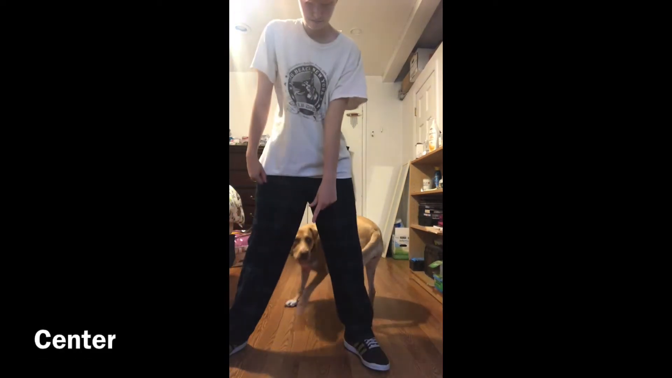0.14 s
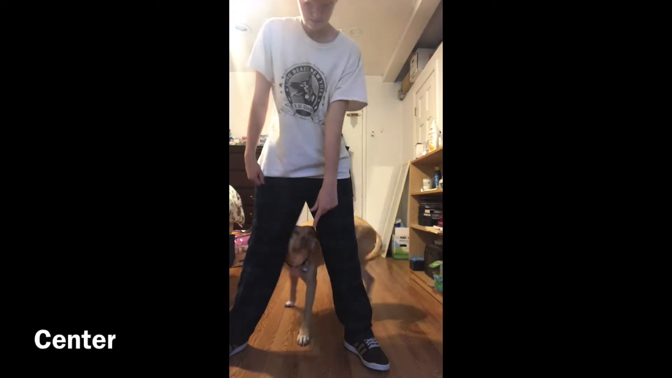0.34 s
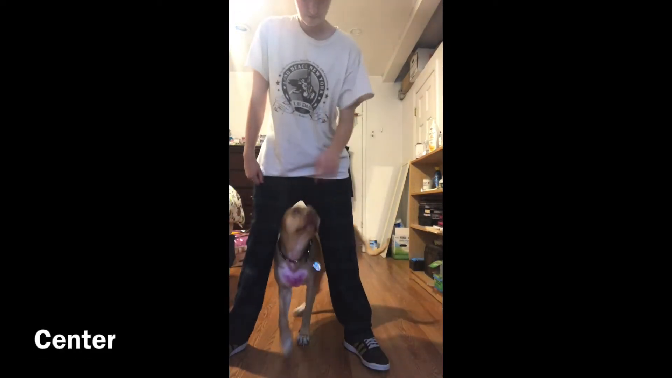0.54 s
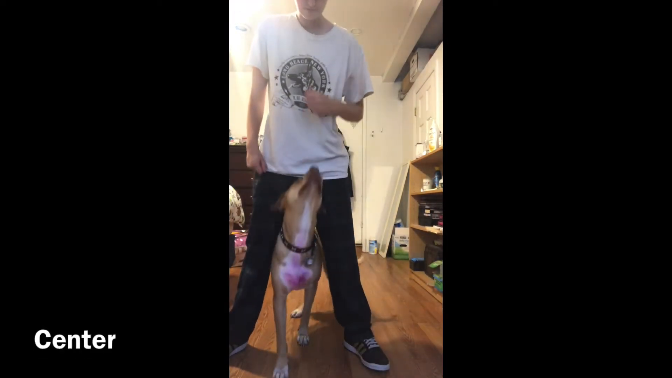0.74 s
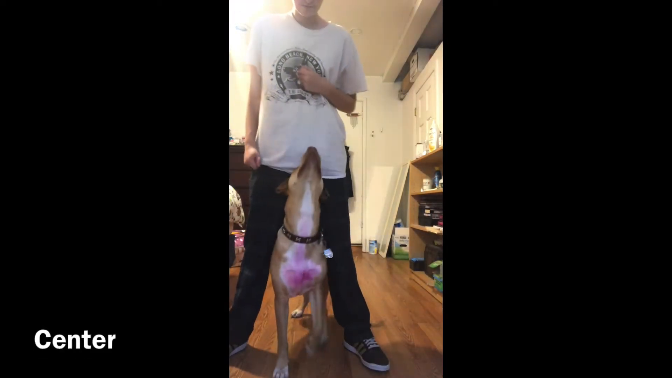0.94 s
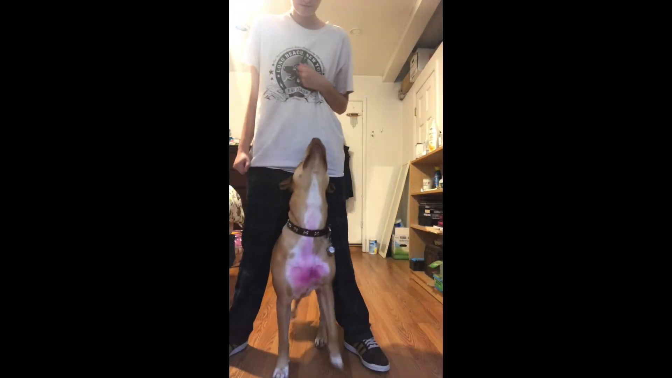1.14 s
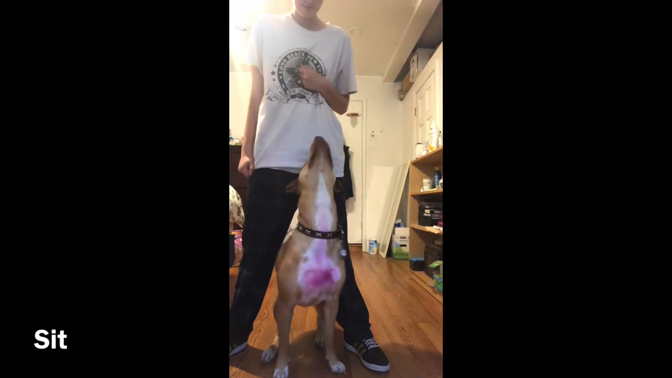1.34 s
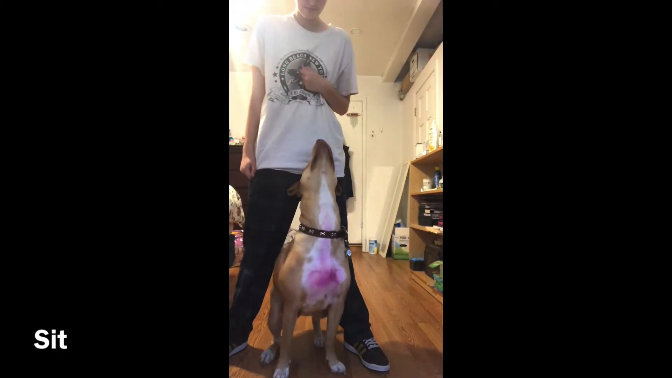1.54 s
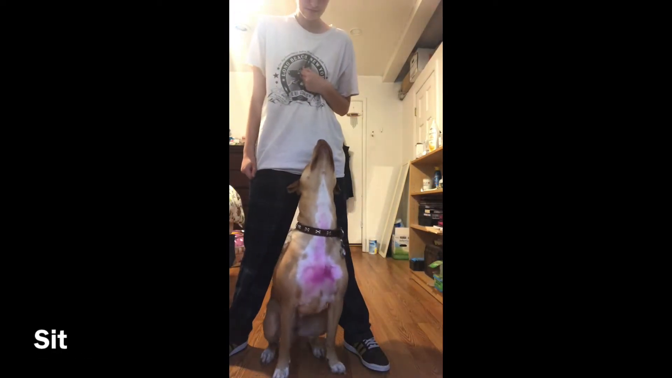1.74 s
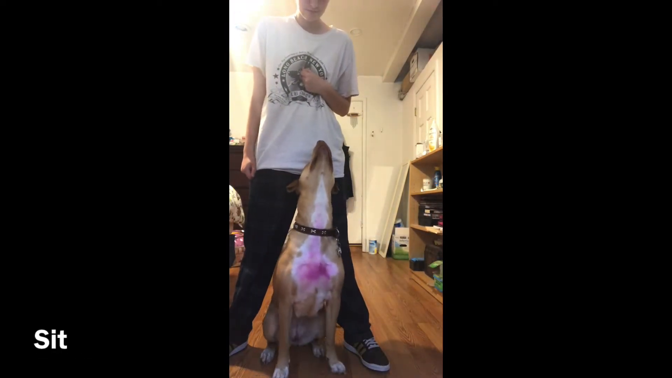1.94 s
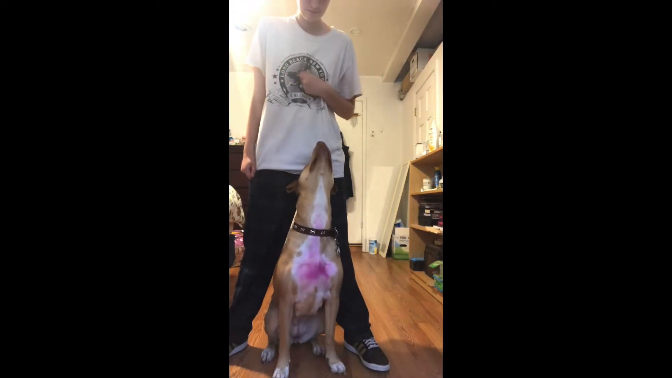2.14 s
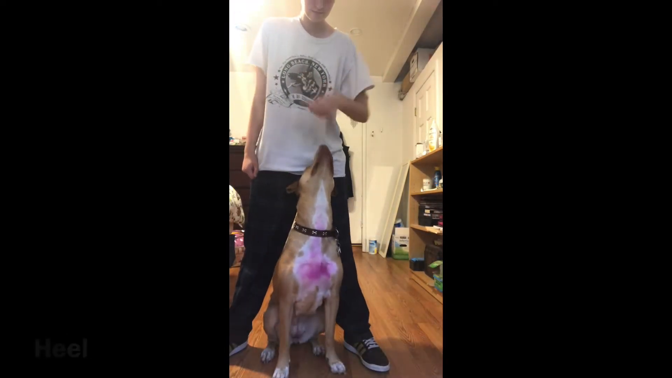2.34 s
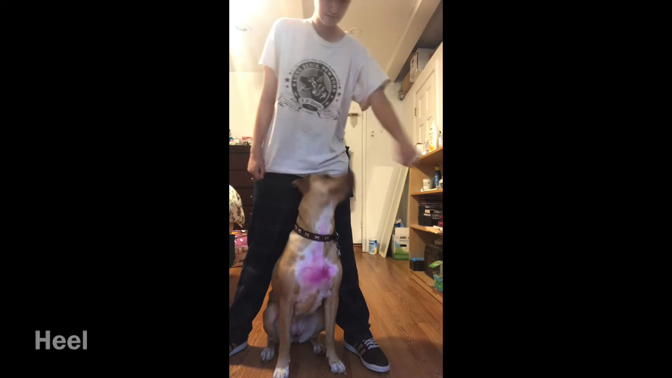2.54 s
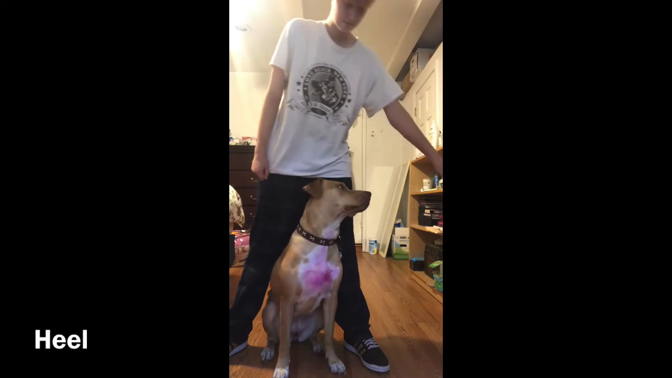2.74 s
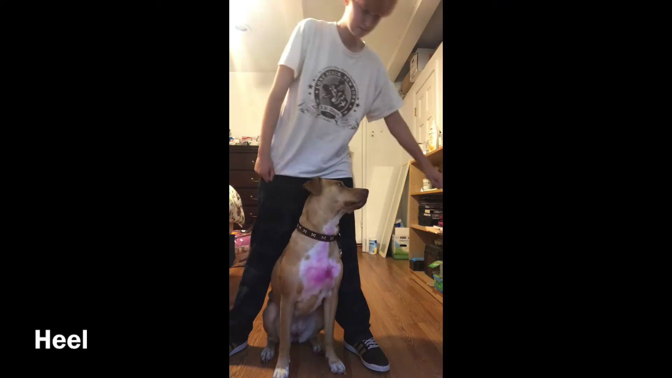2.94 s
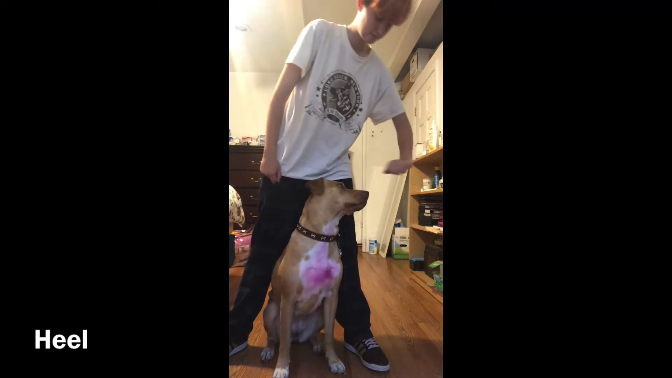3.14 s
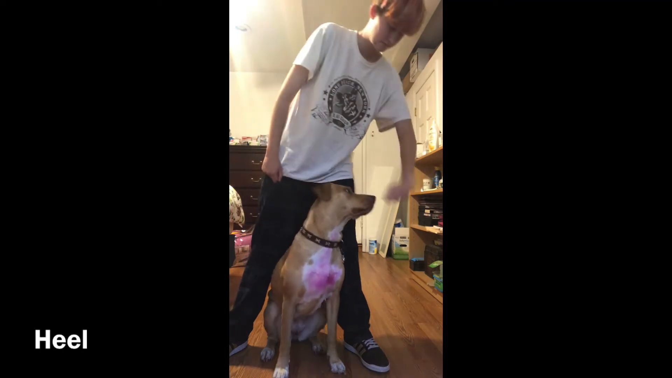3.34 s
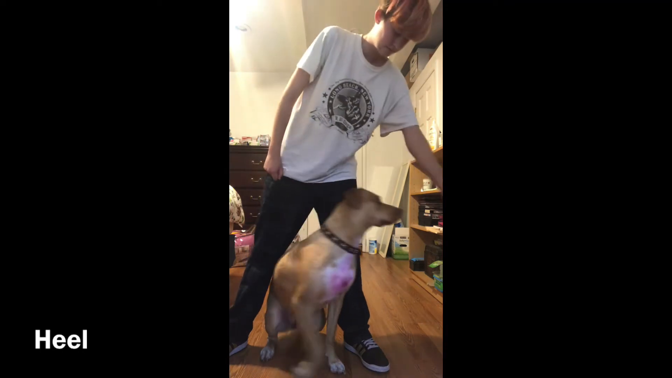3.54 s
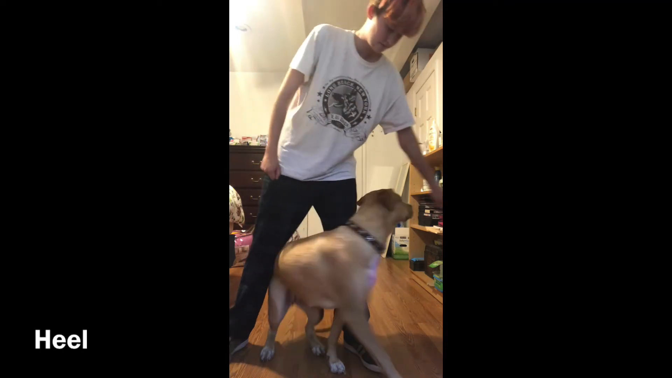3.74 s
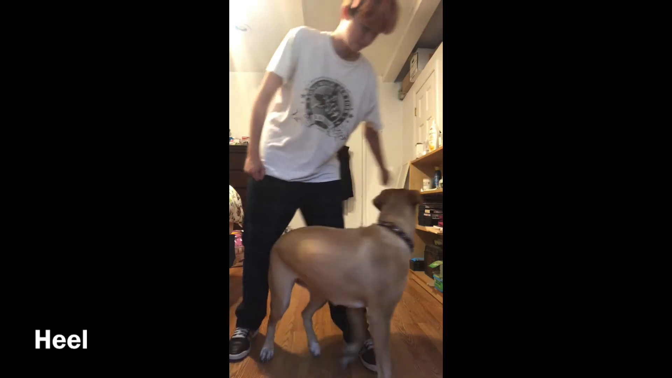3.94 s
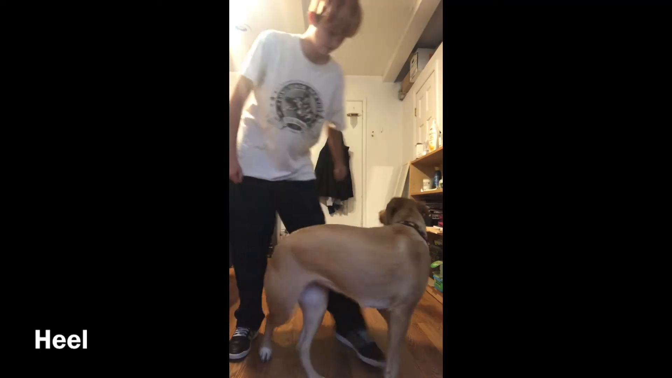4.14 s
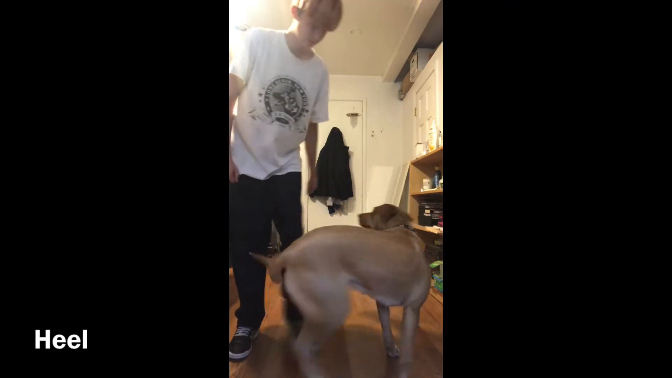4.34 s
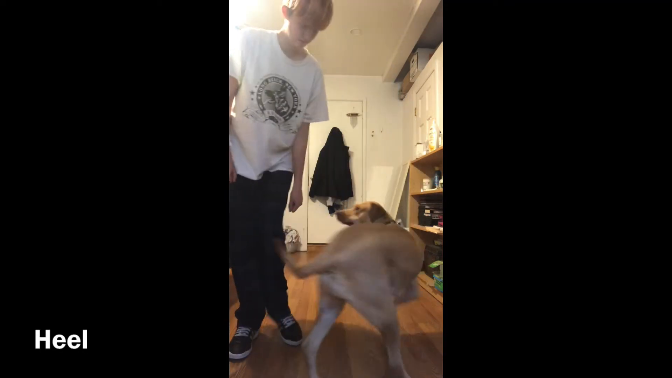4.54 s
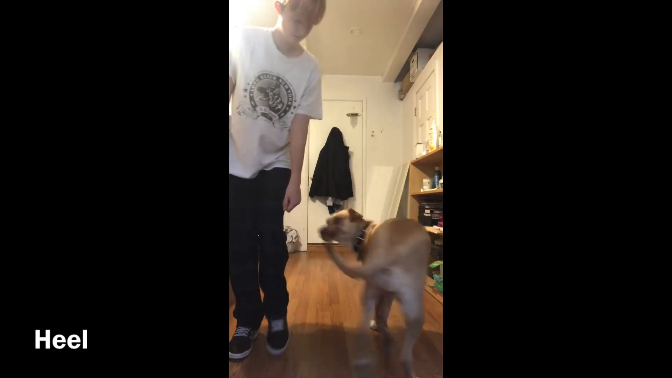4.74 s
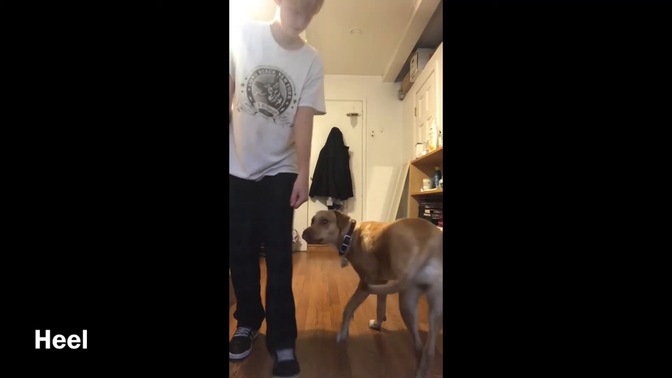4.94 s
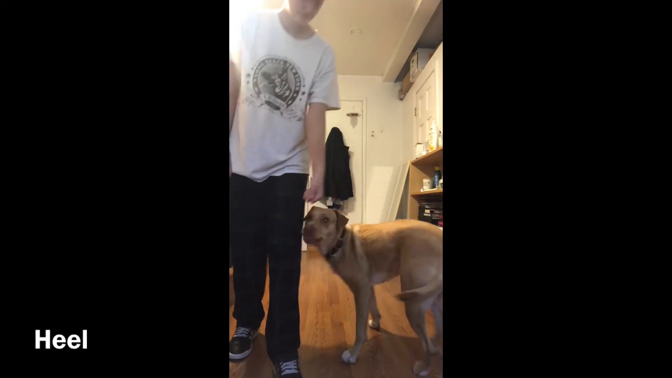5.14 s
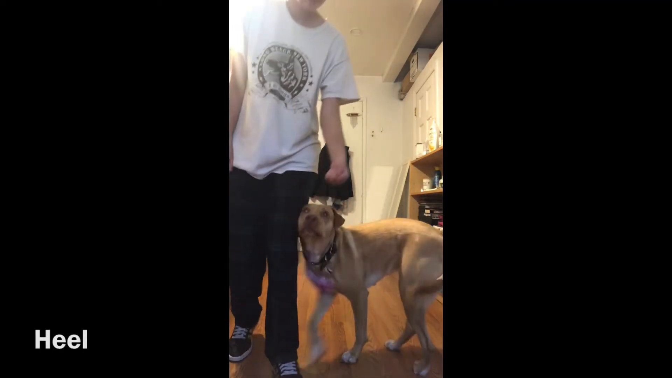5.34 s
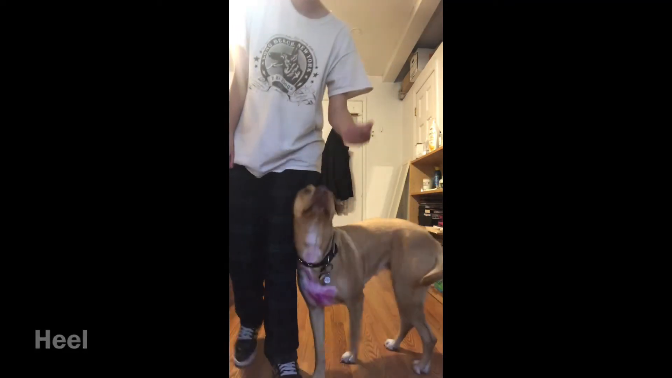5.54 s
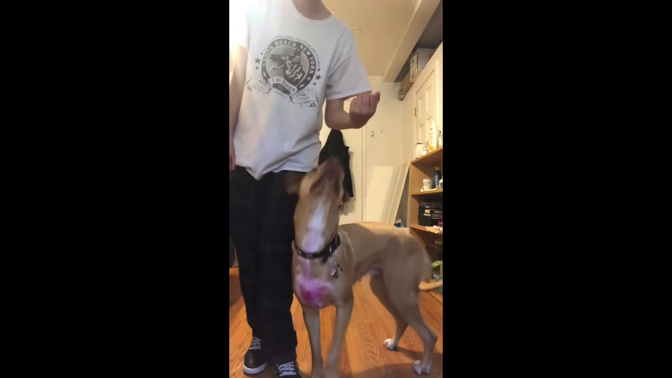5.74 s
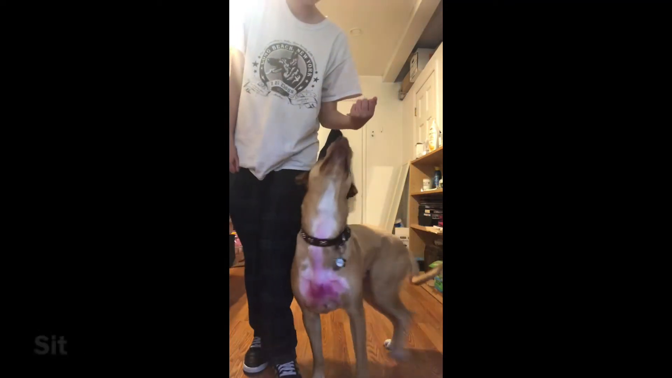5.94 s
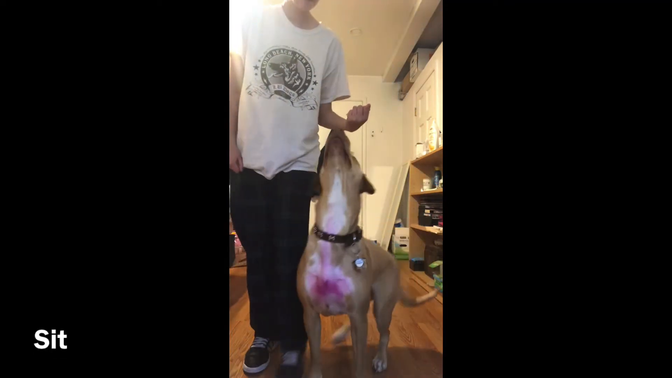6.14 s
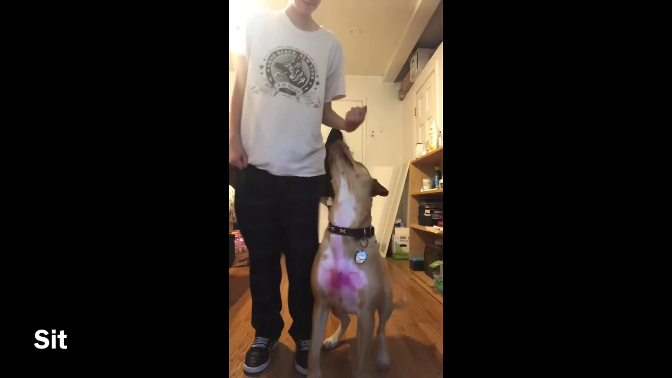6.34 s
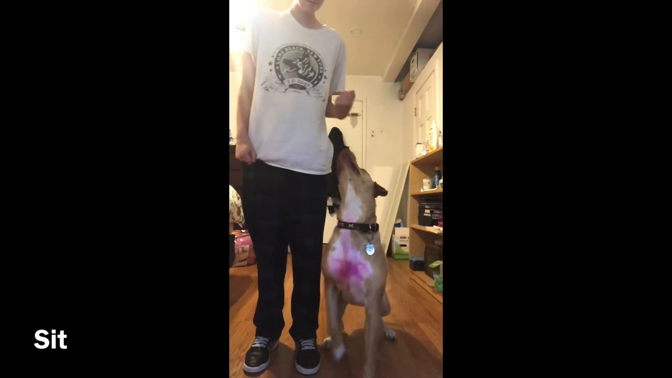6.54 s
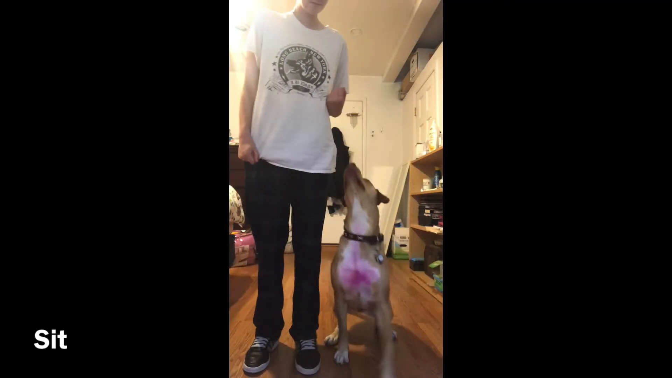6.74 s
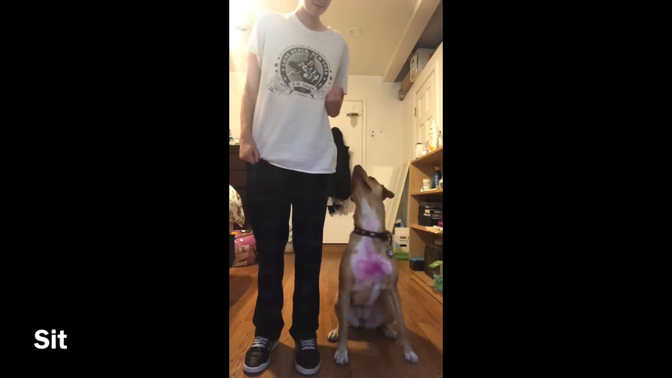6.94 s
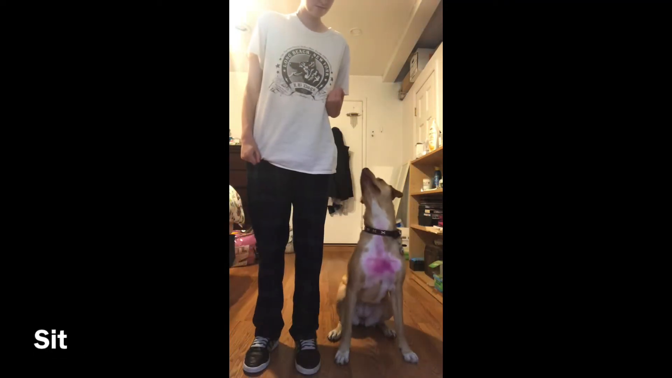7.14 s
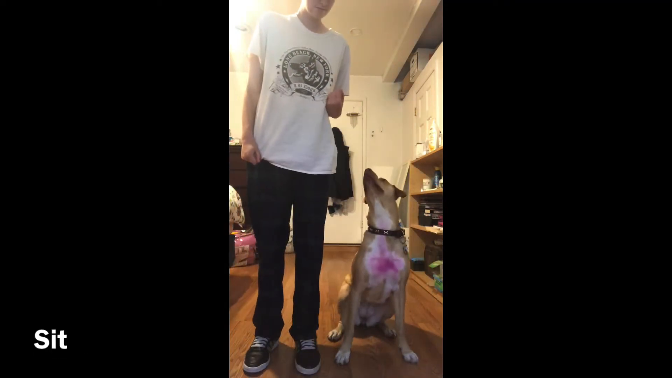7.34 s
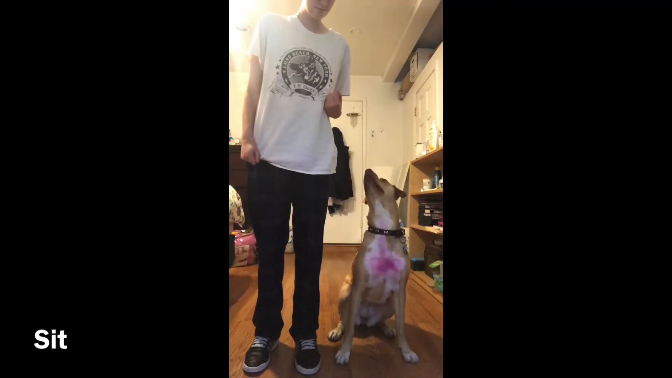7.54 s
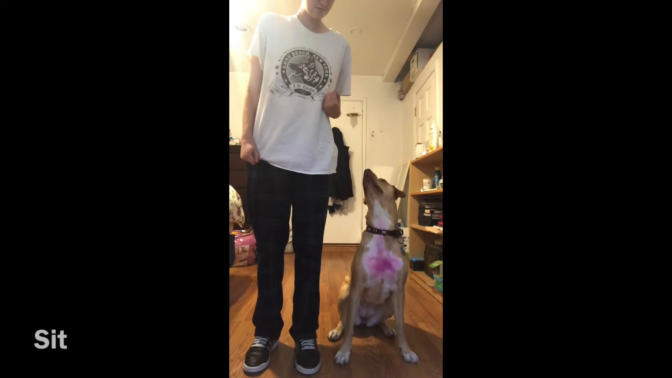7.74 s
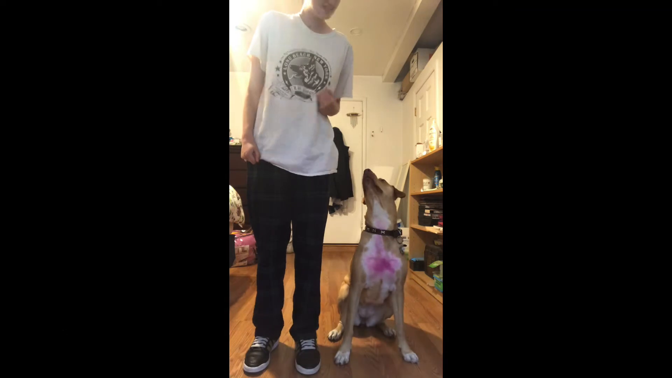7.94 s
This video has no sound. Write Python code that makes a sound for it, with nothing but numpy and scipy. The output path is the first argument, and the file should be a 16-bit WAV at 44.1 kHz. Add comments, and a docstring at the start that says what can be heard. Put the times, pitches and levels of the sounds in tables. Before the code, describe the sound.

Crisp claw ticks, soft thuds and jingling collar tags as a dog steps, sits still, then turns and shuffles on wooden boards indoors.

```python
"""A dog steps, turns and sits on a hardwood floor in a small, live room.
A faint hiss (shaped noise) lies beneath, and a low hum (ringing noise) wavers throughout.
First its claws tick (short tone bursts and broad knocks) and its collar tags clink (noise and ringing modes).
A near-quiet spell of soft thuds (damped board modes) follows, then busier steps with scuffs (shaped noise),
gritty clicks, heavier shoe landings and more clinks; two last faint clacks (a few ringing cycles) close it."""
import sys
import numpy as np
from scipy import signal
from scipy.fft import rfft, irfft
from scipy.io import wavfile
from scipy.ndimage import uniform_filter1d

SR = 44100
rng = np.random.default_rng(int(sys.argv[2]) if len(sys.argv) > 2 else 0)


def transcribe(signal):
    """Save signal, clipped to [-1, 1], as a 16-bit WAV file at the path in sys.argv[1]."""
    frames = np.atleast_2d(signal).T
    limited = np.clip(frames, -1, 1)
    pcm = np.round(limited * 32767).astype(np.int16)
    wavfile.write(sys.argv[1], SR, pcm)


N = 351918
TIME = np.arange(N) / SR

# steady room noise: f/Hz, relative level/dB per Hz
HISS_SPECTRUM = [(15, -27.5), (25, -29.5), (52, -6), (70, -1), (84, -12), (102, -17.5), (157, -16.5),
                 (229, -17.5), (754, -29), (863, -26.5), (1700, -32), (2760, -34.5), (3620, -37),
                 (14800, -46), (16000, -66.5)]
# slow wavering of the low hum, before its trim: t/s, level/dB
HUM_WAVER = [(0.0, -61), (1.35, -68), (5.67, -61), (6.84, -56.5), (7.18, -66.5), (7.98, -61)]
HISS_DB = -62
HUM_HZ, HUM_T60_S, HUM_TRIM_DB = 65.5, 0.16, 3

# tone of the room's echoes: f/Hz, level/dB
ECHO_COLOUR = [(100, -3), (300, 1.5), (1000, -1), (2000, 0.5), (4100, 0), (5000, -3.5), (6000, -1.5),
               (9000, -3), (16000, -4.5)]
# time for the echoes to fall 60 dB: f/Hz, t60/s
ECHO_T60 = [(100, 0.36), (800, 0.3), (2000, .37), (4300, 0.38), (6500, 0.35), (16000, 0.28)]

# creaks and clacks of the floor under a shifting weight: t/s, level/dB of the ringing tone, f/Hz
FLOOR_CLACKS = [(1.389, -43, 3000), (5.4478, -20.5, 1310), (5.4485, -24, 2600), (7.792, -46.5, 4700),
                (7.8462, -45.5, 1800)]
# heel clack: level against its thud at the given softness; harder landings clack more
HEEL_HZ, HEEL_DB = 930, -13.5
HEEL_SOFT_HZ, HEEL_DB_PER_OCTAVE = 413, 19

# soles, pads and claws sliding, before the scuff trim: t/s, rms level/dB, swell/s, brightness f/Hz
SLIDES = [(.342, -40, 0.032, 5500), (.82, -56.5, 0.041, 5760), (1.103, -47.5, 0.011, 5900),
          (1.562, -51.5, 0.017, 5540), (3.41, -63, 0.072, 1390), (3.495, -55.5, 0.025, 4800),
          (3.925, -42, 0.019, 5070), (4.185, -51, .013, 4300), (4.355, -40.5, 0.036, 4630),
          (4.653, -38, 0.029, 5660), (4.708, -28.5, 0.036, 5400), (5.0, -49, .07, 4350),
          (5.202, -41.5, 0.017, 4940), (5.414, -44, 0.024, 1280), (5.467, -43, .018, 2500),
          (5.874, -45, 0.015, 5650), (6.201, -39, .008, 6060)]
# spectrum of the slips: f/Hz, relative level/dB per Hz
SLIP_COLOUR = [(60, -28.5), (300, -2.5), (700, -7), (1500, -1.5), (3000, 2), (6000, 8.5), (16000, 10.5)]
FADE_PER_SWELL = 1.15   # a slide dies away a little more slowly than it builds

# shoes and haunches coming down: t/s, peak level/dB, softness as a cut-off f/Hz
LANDINGS = [(.013, -34.5, 240), (.263, -39.5, 288), (0.526, -48, 290), (.567, -39.5, 291),
            (.637, -43.5, 290), (1.306, -36.5, 51.5), (2.542, -50, 300), (2.813, -47, 360),
            (4.213, -44.5, 300), (4.31, -23, 383), (4.962, -27, 384), (5.389, -40, 595), (5.475, -30, 443),
            (6.27, -33.5, 550)]
# floorboard modes, before random variation: f/Hz, relative level/dB, t60/s
BOARD_MODES = [(59, -12.5, .2), (137, -17.5, 0.03), (167.3, -5.5, .1), (231, 1.5, 0.081), (301, 0, 0.076),
               (382, -4, 0.048), (445, -4, .05), (531, 0.5, 0.048), (645, -1, 0.012)]
SOLE_LAG_S, SOLE_DB = .0135, -10   # a weaker second thud, as of the sole, follows the first contact
PAD_DB, PAD_SOFT_HZ = -31, 360   # the pad's thud against the claw, and its softness as a cut-off

# tag modes of a free disc, before detuning: f/Hz, relative level/dB, t60/s
DISC_MODES = [(8000, -14, .025), (8720, -15, 0.088), (9336, -5, 0.16), (9300, -21.5, 0.15),
              (9900, -13, 0.13), (11300, -11.5, .1), (11720, -5, 0.048), (12700, -19.5, .03),
              (14100, -17.5, .04), (15500, -23, 0.038), (15400, -12, 0.16)]
# swings of the collar tags: t/s, level/dB of the first bounce before the clash and ring trims,
# ring level/dB (0 when free), gap between bounces/s, loss per bounce/dB
TAG_SWINGS = [(0.1685, -19.5, -6, .004, 3.5), (.2475, -30.5, -12, .003, 27), (0.3136, -24.5, -12, .004, 12),
              (.683, -27, -14, 0.022, 8), (0.926, -32.5, -17, .004, 12), (4.7633, -17, -1.5, .023, 5.5),
              (4.8415, -25.5, -0.5, .02, 22), (4.932, -22, -4, .002, 14), (4.9376, -12.5, -6, 0.0028, 5),
              (5.036, -21, -10, 0.026, 7.5), (5.5035, -20.5, -10, .004, 17),
              (5.9159, -14.5, -13, 0.0035, 14)]
# pressed together, the tags lose this much more of their ring for each octave below the highest mode
LOW_MODE_DAMPING = 1

# spectrum of a board knock: f/Hz, relative level/dB per Hz
KNOCK_COLOUR = [(100, -23), (480, -13), (800, -1.5), (1500, -0.5), (2500, 2), (4200, 8), (6500, 5),
                (9000, -8.5), (16000, -50)]
# spectrum of a claw's hard edge: f/Hz, relative level/dB per Hz
CRACK_COLOUR = [(4000, -23.5), (8500, -3), (12000, -6.5), (16000, -13)]
# paws landing on their claws: t/s, peak level/dB of the first claw's tick and knock, tick f/Hz,
# hard edge level/dB and room send level/dB (both before trims),
# roll from first claw to last/s, last claw level/dB against the first
PAW_STEPS = [(0.0146, -8.5, 4740, -5, -2.5, 0.014, 2), (.272, -11, 5500, -5, 0.5, 0.0026, -17),
             (.609, -26, 4520, -21, -0.5, 0.014, -12), (.6562, -11, 6440, -5.5, 0, 0.0032, -28),
             (0.9534, -9, 5400, -2.5, 0, .003, -19), (1.1556, -11.5, 5940, -10, 0, 0.015, -3),
             (1.5356, -28.5, 5060, -44.5, 4, 0.024, 5), (1.6612, -13, 5350, -9, -0.5, 0.0058, 0.5),
             (3.3714, -42.5, 5240, -17, 6, .003, -12), (3.584, -38.5, 3760, -26, 2, .003, -14),
             (3.786, -12.5, 7100, -2, 5.5, 0.0024, -17), (3.8911, -18.5, 5840, -25, 2.5, .021, -9.5),
             (4.0568, -6.5, 6430, -5.5, -2, 0.015, -9.5), (4.542, -33.5, 5930, -5, 0, .004, -19),
             (4.6223, -3.5, 5160, -7.5, -2, 0.014, -9), (4.725, -8, 6170, 4, 0, 0.0023, -9),
             (5.0165, -14.5, 6100, -12, -3, 0.015, -2.5), (5.2064, -14, 4400, -17, -3, 0.0029, -13),
             (5.4958, -22.5, 6100, -10, 4, .007, -0.5), (5.5783, -11.5, 6200, -6, .5, .003, -22),
             (5.903, -26, 6230, -12, 8, .016, 5), (6.023, -8.5, 5400, -3, 2, .0084, -11),
             (6.1788, -6, 6260, -5, -1.5, 0.0022, -13), (6.4156, -11.5, 5900, -5, 1, 0.0018, -5),
             (6.6238, -6.5, 5900, -16.5, -1.5, 0.022, 2), (6.895, -19, 5300, -18, 3, 0.0084, -6.5)]
MIDDLE_CLAWS_DB = -9.5   # the two middle claws, against the weaker of the first and the last
CLAW_PITCH_SPREAD = .06   # share by which the claws of one paw differ
# spells of shifting about, claws grazing the floor between steps: start t/s, end t/s, typical peak level/dB
GRAZE_SPELLS = [(0.755, 1.1, -30.5), (4.18, 5.3, -31), (5.872, 6.3, -33)]
GRAZE_GAP_S, GRAZE_SPREAD_DB = 0.13, 3
GRAZE_HZ, GRAZE_EDGE_DB, GRAZE_ROOM_DB = 5000, -18, 6

CUTOFF_HZ = 16000
HEADROOM = 0.78   # the microphone rounds peaks towards this height


def from_db(db):
    """Decibels to gain."""
    return 10 ** (np.asarray(db) / 20)


def rms_one(x):
    """Scale to unit rms."""
    return x / np.sqrt(np.mean(x ** 2) + 1e-20)


def peak_one(x):
    """Scale to unit peak."""
    return x / (np.abs(x).max() + 1e-20)


def at_hz(points, hz):
    """Read a table on a log-frequency axis."""
    points = np.array(points)
    return np.interp(np.log(np.maximum(hz, 1)), np.log(points[:, 0]), points[:, 1])


def add(track, s, sound):
    """Mix a sound into a track from time s on."""
    start = max(0, round(s * SR))
    track[start:start + len(sound)] += sound[:N - start]


def low_pass(x, hz, order=2):
    """Take the treble off."""
    return signal.sosfilt(signal.butter(order, min(hz, SR / 2 - 1), fs=SR, output="sos"), x)


def coloured(x, spectrum):
    """Give a sound a smooth spectrum."""
    gain = from_db(at_hz(spectrum, np.fft.rfftfreq(len(x), 1 / SR)))
    return irfft(rfft(x) * gain, len(x))


def ring(clicks, hz, t60):
    """A two-pole resonator: a unit click sets a sine of height 1 ringing and dying away."""
    decay = from_db(-60 / (t60 * SR))
    turn = 2 * np.pi * hz / SR
    return signal.lfilter([0, np.sin(turn)], [1, -2 * decay * np.cos(turn), decay * decay], clicks + 1e-18)


def background():
    """Steady room noise; noise through a low resonance gives a hum that wavers."""
    # the first second is dropped so that the hum is already under way
    hum = ring(rng.standard_normal(N + SR), HUM_HZ, HUM_T60_S)
    hum = rms_one(low_pass(hum, 2 * HUM_HZ)[SR:])
    hum *= from_db(HUM_TRIM_DB + np.interp(TIME, *np.transpose(HUM_WAVER)))
    hiss = rms_one(coloured(rng.standard_normal(N), HISS_SPECTRUM))
    return from_db(HISS_DB) * hiss + hum


def room(x, first_s=.0015, build_s=0.0043, sparse_db=6.0, merge_s=0.01):
    """Separate wall echoes merge into a smooth tail whose decay time depends on pitch."""
    t, response = TIME[:SR], np.zeros(SR)
    edges = np.geomspace(60, 17000, 17)
    # early echoes stand out unevenly; the unevenness fades as they merge
    lumps = from_db(sparse_db * np.minimum(rng.exponential(1, SR), 5) * np.exp(-t / merge_s))
    lumps /= np.sqrt(uniform_filter1d(lumps ** 2, size=300))
    echoes = rng.standard_normal((2, SR)) * lumps * np.clip((t - first_s) / build_s, 0, 1)
    for k, (low, high) in enumerate(zip(edges, edges[1:])):
        hz = np.sqrt(low * high)
        band_filter = signal.butter(2, [low, high], "band", fs=SR, output="sos")
        band = signal.sosfilt(band_filter, echoes[k % 2])
        band *= from_db(-60 * t / at_hz(ECHO_T60, hz))
        # each band carries energy in proportion to its width
        even = np.sqrt(2 * (high - low) / SR / np.sum(band ** 2))
        response += from_db(at_hz(ECHO_COLOUR, hz)) * band * even
    return signal.fftconvolve(x, response)[:N]


def heels():
    """The harder a footfall, the more it clacks: rows of t/s, level/dB, f/Hz."""
    rows = []
    for s, peak_db, soft_hz in LANDINGS:
        hardness_db = HEEL_DB_PER_OCTAVE * np.log2(soft_hz / HEEL_SOFT_HZ)
        rows.append((s, peak_db + HEEL_DB + hardness_db, HEEL_HZ))
    return rows


def clacks(cycles=9, rasp_db=-9):
    """A board gives way, or a heel strikes, with a snap that rings a few cycles."""
    out, t = np.zeros(N), TIME[:SR // 10]
    for s, level_db, hz in list(FLOOR_CLACKS) + heels():
        t60 = cycles / hz
        tone = ring(signal.unit_impulse(len(t)), hz, t60)
        burst = np.diff(rng.standard_normal(len(t) + 1)) * np.exp(-2 * t / t60)
        rasp = peak_one(low_pass(burst, 1.5 * hz, order=4))
        add(out, s, from_db(level_db) * (tone + from_db(rasp_db) * rasp))
    return out


def scuffs(grain_db=1.5, judder_db=3, sheen_db=-15):
    """Sliding is a dense run of tiny slips that judders, swells and fades; a dull sole keeps a faint sheen."""
    out, t = np.zeros(N), TIME[:SR]
    for s, level_db, swell, bright_hz in SLIDES:
        grain = np.minimum(rng.exponential(1, len(t)), 2)
        slips = rng.standard_normal(len(t)) * from_db(grain_db * grain)
        judder = rms_one(uniform_filter1d(rng.standard_normal(len(t)), size=130))
        slips *= from_db(judder_db * np.clip(judder, -2, 2))
        slips = coloured(slips, SLIP_COLOUR)
        rub = rms_one(low_pass(slips, bright_hz, order=4)) + from_db(sheen_db) * rms_one(slips)
        lead = min(s, 2 * swell)
        stroke = np.exp(-((t - lead) / np.where(t < lead, swell, FADE_PER_SWELL * swell)) ** 2)
        add(out, s - lead, from_db(level_db) * stroke * rub)
    return out


def grit(rubs, per_s=35, grit_db=23, top_db=-25):
    """While something slides, stray nail tips and specks of dirt tick at random."""
    rubbing = np.sqrt(np.abs(uniform_filter1d(rubs ** 2, size=2000)))
    sizes = rng.uniform(-1, 1, N)
    clicks = (rng.random(N) < per_s / SR) * sizes
    return coloured(clicks, KNOCK_COLOUR) * np.minimum(rubbing * from_db(grit_db), from_db(top_db))


def pushes():
    """Paws land on their pads, footfalls in two stages: rows of t/s, peak level/dB, softness f/Hz."""
    pads = [(s, peak_db + PAD_DB, PAD_SOFT_HZ) for s, peak_db, *_ in PAW_STEPS]
    soles = [(s + SOLE_LAG_S, peak_db + SOLE_DB, soft_hz) for s, peak_db, soft_hz in LANDINGS]
    return list(LANDINGS) + soles + pads


def footfalls():
    """A soft push sets the boards thudding; the softer it is, the fewer modes answer."""
    out, push = np.zeros(N), signal.unit_impulse(SR // 2)
    for s, peak_db, soft_hz in pushes():
        thud = 0
        for hz, db, t60 in BOARD_MODES:
            mode = ring(push, hz * rng.normal(1, 0.059), t60)
            thud = thud + mode * from_db(db + rng.uniform(-5, 5))
        add(out, s, from_db(peak_db) * peak_one(low_pass(thud, soft_hz, order=3)))
    return out


def tag_touches(count=4):
    """Each swing ends in a run of ever weaker bounces: rows of t/s, level/dB, ring level/dB."""
    return [(s + k * gap_s, level_db - k * loss_db, free_db)
            for s, level_db, free_db, gap_s, loss_db in TAG_SWINGS for k in range(count)]


def tags(ring_db=-7, clash_s=0.0023, clash_hz=9000, clash_db=-1, detune=0.0044):
    """Thin metal discs clash briefly; their modes ring on unless the discs are pressed together."""
    out, t, blow = np.zeros(N), TIME[:SR // 20], signal.unit_impulse(SR // 3)
    bright = signal.butter(3, clash_hz, "high", fs=SR, output="sos")
    top_hz = max(hz for hz, _, _ in DISC_MODES)
    for s, level_db, free_db in tag_touches():
        burst = rng.standard_normal(len(t)) * np.exp(-t / clash_s)
        clash = peak_one(signal.sosfilt(bright, burst))
        # the point of contact on the rim decides which modes answer
        answers = np.cos(2 * np.pi * rng.random(len(DISC_MODES)))
        tone = 0
        for answer, (hz, db, t60) in zip(answers, DISC_MODES):
            # discs pressed together ring shorter and thinner; every touch is a little off pitch
            mode = ring(blow, hz * rng.normal(1, detune), t60 * from_db(free_db / 2))
            damping_db = LOW_MODE_DAMPING * free_db * np.log2(top_hz / hz)
            tone = tone + answer * mode * from_db(db + damping_db)
        add(out, s, from_db(level_db + clash_db) * clash)
        add(out, s, from_db(level_db + ring_db + free_db) * tone)
    return out


def claw_touches():
    """Paws roll over four claws, shuffling adds grazes: t/s, peak/dB, f/Hz, edge/dB, room send/dB."""
    touches = []
    for s, peak_db, hz, edge_db, room_db, roll_s, last_db in PAW_STEPS:
        # the middle two touch at random moments during the roll
        when = [0, *rng.uniform(.15, .85, 2), 1]
        middle_db = min(0, last_db) + MIDDLE_CLAWS_DB
        pitches = [hz, *hz * rng.normal(1, CLAW_PITCH_SPREAD, size=3)]
        for share, db, pitch in zip(when, (0, middle_db, middle_db, last_db), pitches):
            touches.append((s + share * roll_s, peak_db + db, pitch, edge_db, room_db))
    for start, end, peak_db in GRAZE_SPELLS:
        gaps = rng.uniform(.5, 1.5, size=16)
        strengths = rng.standard_normal(size=16)
        times = start + GRAZE_GAP_S * (np.cumsum(gaps) - gaps[0])
        for s, strength in zip(times, strengths):
            if s < end:
                graze_db = peak_db + GRAZE_SPREAD_DB * strength
                touches.append((s, graze_db, GRAZE_HZ, GRAZE_EDGE_DB, GRAZE_ROOM_DB))
    return touches


def claws(skid_db=-22, skid_s=0.00087, spot_db=1.5, width_hz=1250, board_db=-11, crack_db=-5,
          tick_room_db=-10.5, chatter_db=-17, chatter_s=0.0026, knock_room_db=-2.5, chatter_room_db=-23.0):
    """Each claw gives a short pitched tick, a broad board knock and a bright crack; also two room sends."""
    direct, sends = np.zeros(N), np.zeros((2, N))
    size = 1024
    f, t, lead = np.fft.rfftfreq(size, 1 / SR), TIME[:size], size / 2 / SR
    for s, peak_db, hz, edge_db, room_db in claw_touches():
        tick = np.exp(-((f - hz) / width_hz) ** 2)
        knock = from_db(board_db + at_hz(KNOCK_COLOUR, f))
        knock += from_db(crack_db + edge_db + at_hz(CRACK_COLOUR, f))
        # every spot on the floor colours the knock in its own way
        ripple = np.c_[np.geomspace(500, 16000, num=14), rng.standard_normal(14)]
        knock *= from_db(spot_db * at_hz(ripple, f))
        # the board radiates widely, so the room gets more knock than tick
        spectra = [tick + knock, from_db(tick_room_db) * tick + knock]
        near, wide = np.fft.fftshift(irfft(spectra), axes=1)
        gain = from_db(peak_db) / np.abs(near).max()
        # the tip skids for a moment before it bites (a decay turned backwards)
        skid = np.convolve(near, rng.standard_normal(size) * np.exp(-t / skid_s))[:size][::-1]
        # and chatters before it settles
        chatter = np.convolve(wide, rng.standard_normal(size) * np.exp(-t / chatter_s))[:size]
        add(direct, s - lead, gain * (from_db(skid_db) * skid + near + from_db(chatter_db) * chatter))
        to_room = from_db(knock_room_db) * wide + from_db(chatter_room_db) * chatter
        add(sends[rng.integers(len(sends))], s - lead, gain * from_db(room_db) * to_room)
    return direct, sends


def scene(claw_room_db=5, tag_room_db=-3, foot_room_db=-4, scuff_room_db=-4, scuff_db=-2):
    """Every source is heard directly and through the room; the claws' two spots have their own echoes."""
    ticks, tick_sends = claws()
    clinks = tags()
    thuds = footfalls() + clacks()
    rubs = from_db(scuff_db) * scuffs()
    rubs = rubs + grit(rubs)
    room_send = from_db(tag_room_db) * clinks
    room_send += from_db(foot_room_db) * thuds
    room_send += from_db(scuff_room_db) * rubs
    echoes = room(room_send)
    echoes += from_db(claw_room_db) * sum(room(send) for send in tick_sends)
    return (ticks + clinks + thuds + rubs + echoes + background())[None]


def record(dry):
    """A small microphone loses the deepest bass and rounds the sharpest peaks; the top is cut steeply."""
    thin = signal.sosfilt(signal.butter(3, 34, "high", fs=SR, output="sos"), dry)
    rounded = HEADROOM * np.tanh(thin / HEADROOM)
    steep = signal.ellip(10, .2, 80, CUTOFF_HZ, fs=SR, output="sos")
    return signal.sosfilt(steep, rounded)


dry = scene()
out = record(dry)
transcribe(out)
```